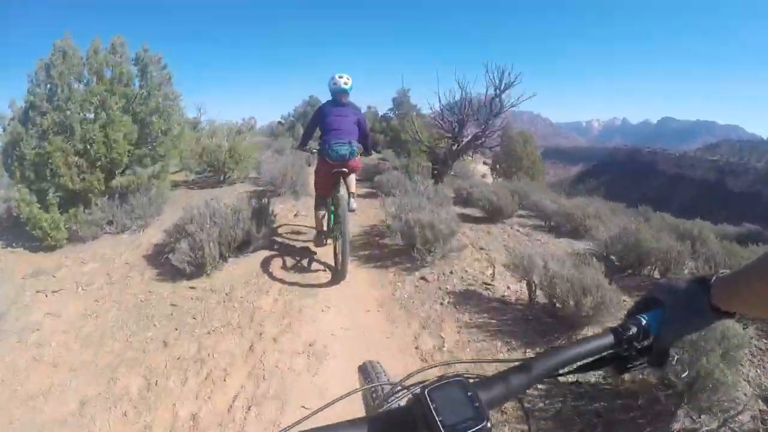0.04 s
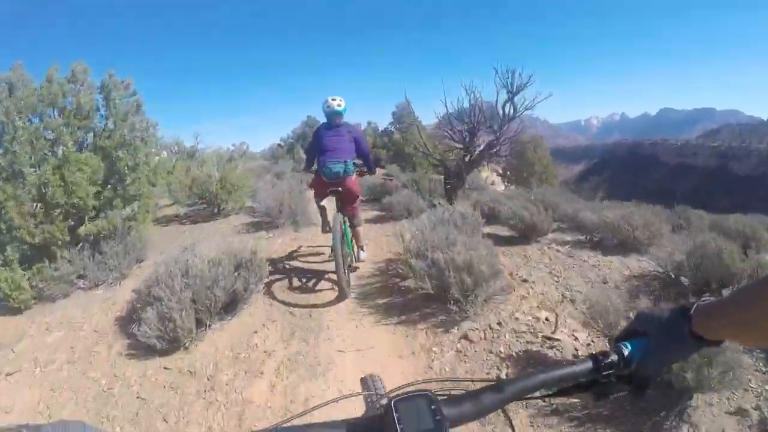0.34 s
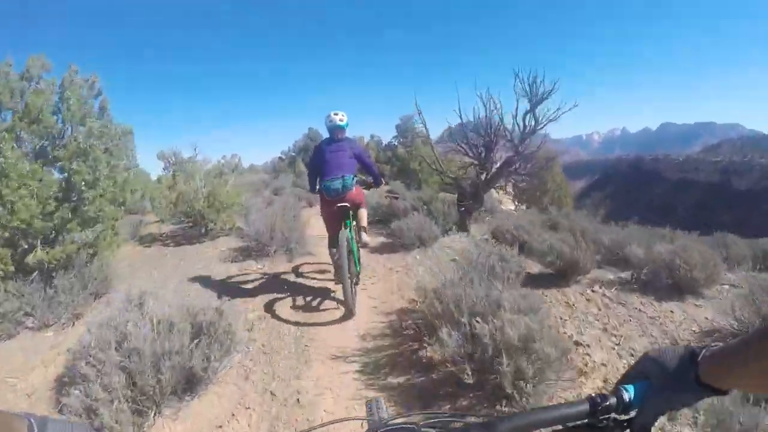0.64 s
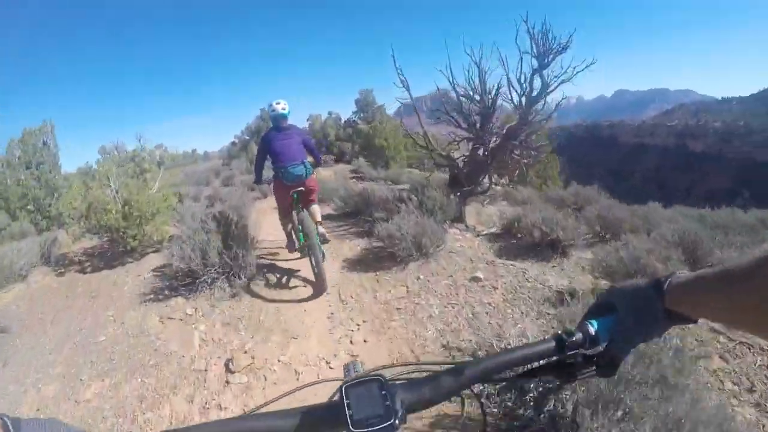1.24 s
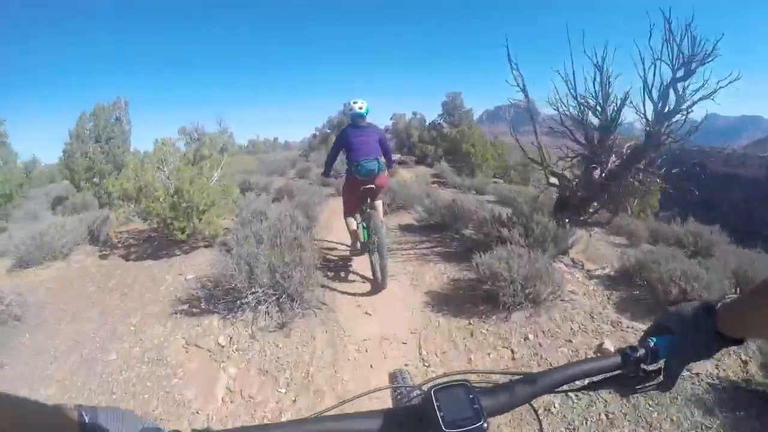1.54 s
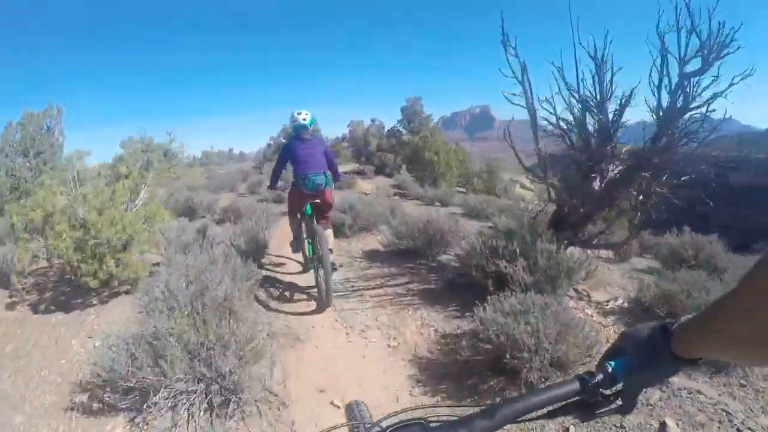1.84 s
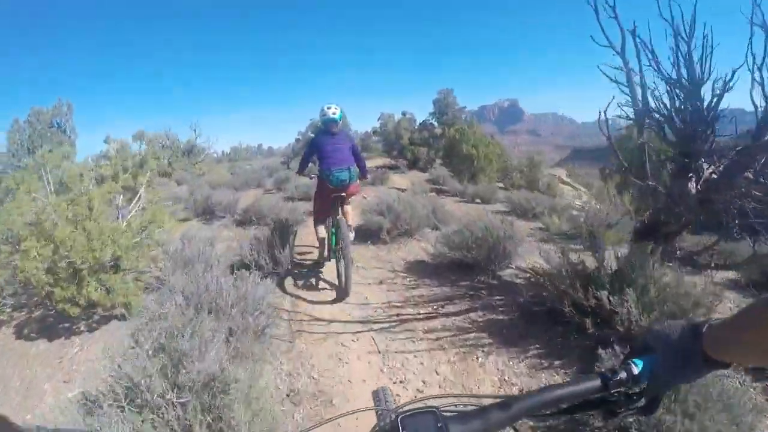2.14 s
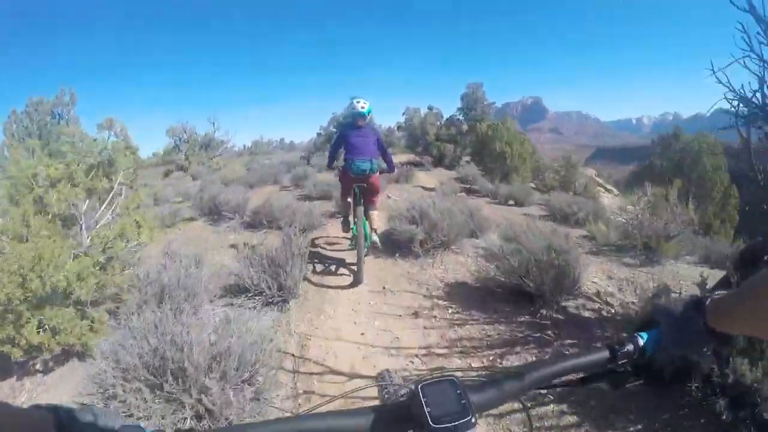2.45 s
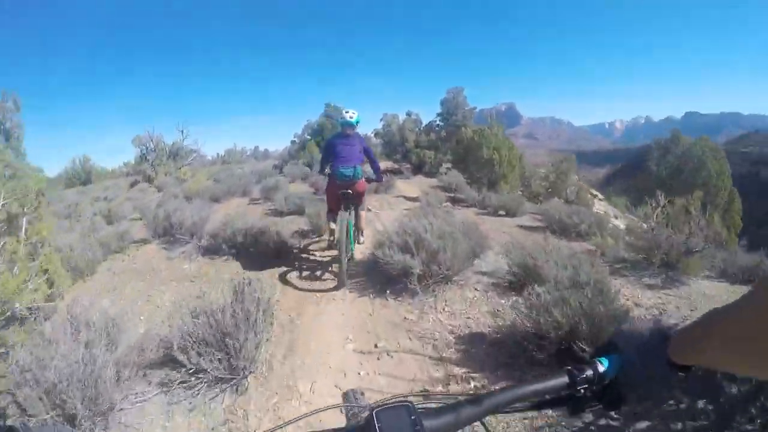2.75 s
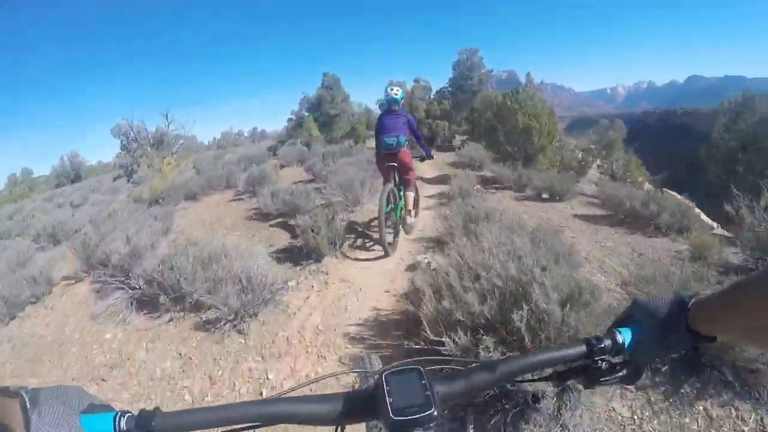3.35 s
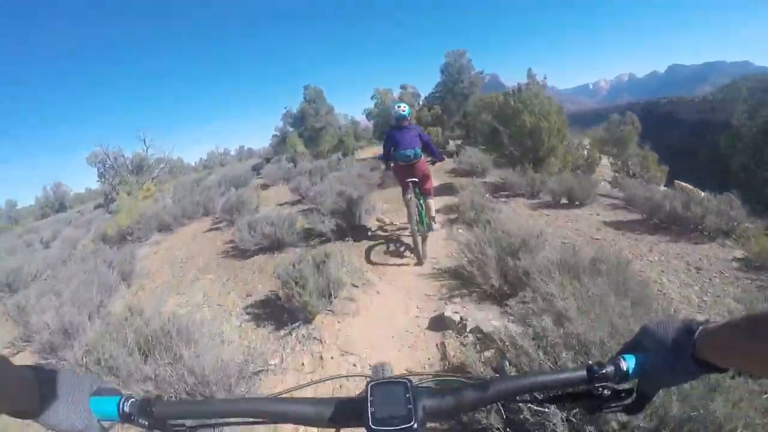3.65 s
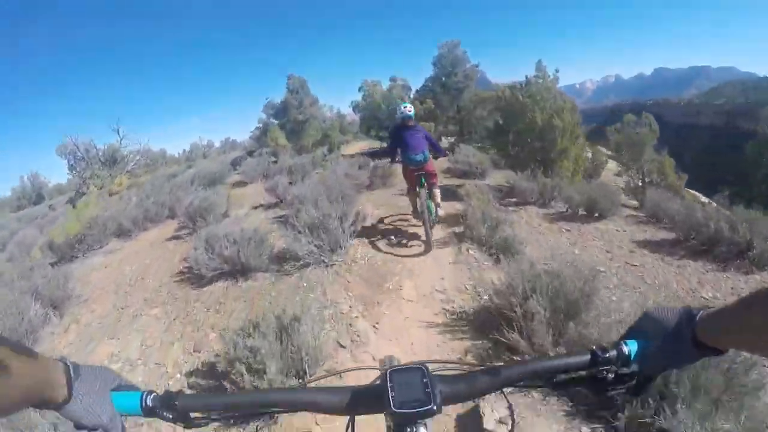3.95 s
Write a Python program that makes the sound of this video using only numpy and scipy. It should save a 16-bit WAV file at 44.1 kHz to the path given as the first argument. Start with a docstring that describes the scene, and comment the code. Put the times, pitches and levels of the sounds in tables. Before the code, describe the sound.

A mountain bike rolls over dirt, with wind buffeting the microphone and gear shifter clicks.

```python
"""A mountain bike rolls along a dry dirt trail, heard from a camera on the rider's chest.
From the start, wind buffets the microphone and the tyres roar and crunch. Soon the chain rattles and
pebbles scrape. At about 1 s the gear shifter clicks in and out and the chain whirs up; both happen
again near 2.8 s. After 3 s the freehub (the rear wheel's ratchet) ticks louder as the bike coasts,
and near 3.7 s a loose stone clacks under a wheel."""
import sys
import numpy as np
from scipy import signal
from scipy.fft import rfft, irfft
from scipy.io import wavfile
from scipy.ndimage import uniform_filter1d

SR = 44100
rng = np.random.default_rng(int(sys.argv[2]) if len(sys.argv) > 2 else 0)


def transcribe(signal):
    """Save signal, clipped to [-1, 1], as a 16-bit WAV file at the path in sys.argv[1]."""
    frames = np.atleast_2d(signal).T
    limited = np.clip(frames, -1, 1)
    pcm = np.round(limited * 32767).astype(np.int16)
    wavfile.write(sys.argv[1], SR, pcm)


N = 176400  # 4 seconds
TIME = np.arange(N) / SR


def gain(db):
    """Turn decibels into a multiplier."""
    return 10 ** (np.asarray(db) / 20)

def unit(x):
    """Scale to an average strength (rms) of 1."""
    return x / np.sqrt(np.mean(x ** 2))

def curve(table, column=1):
    """Join one column of a table with straight lines over time."""
    rows = np.array(table)
    return np.interp(TIME, rows[:, 0], rows[:, column])

def colour(x, tone):
    """Shape a sound's lows and highs with (frequency [Hz], level [dB]) points."""
    hz, db = np.array(tone).T
    log_hz = np.log(np.maximum(np.arange(N // 2 + 1) * SR / N, 1))
    outside = np.maximum(np.log(hz[0]) - log_hz, 0) + np.maximum(log_hz - np.log(hz[-1]), 0)
    shape_db = np.interp(log_hz, np.log(hz), db) - 20 * outside
    return unit(irfft(rfft(x) * gain(shape_db), N))

def noise(tone):
    """Noise with the given tone."""
    return colour(rng.standard_normal(N), tone)

def wander(per_s):
    """A value that glides randomly up and down."""
    step = int(SR / per_s)
    stairs = np.repeat(rng.standard_normal(N // step + 1), step)
    return unit(uniform_filter1d(stairs, step)[:N])

def grains(per_s, spread_db):
    """Tiny random hits, a few much stronger than the rest."""
    size = gain(spread_db * np.minimum(rng.exponential(size=N), 4))
    return (rng.random(N) < per_s / SR) * size * rng.choice([-1, 1], N)

def fade(start, decay_s, rise_s):
    """A level that rises quickly, then falls to about a third every decay_s."""
    age = np.maximum(TIME - start, 0)
    fall = np.minimum(np.maximum(age - rise_s, 0) / decay_s, 50)
    return np.minimum(age / rise_s, 1) * np.exp(-fall)

def swell(middle, width):
    """A smooth, bell-shaped rise and fall."""
    return np.exp(-.5 * np.minimum(((TIME - middle) / width) ** 2, 100))

def ring(start, notes, rise_s):
    """A struck object's notes, a little different at each hit; each drops 60 dB in its ring time."""
    age = np.arange(SR // 8) / SR
    wave = 0
    for hz, ring_s, db in notes:
        cycles = hz * (1 + .01 * rng.standard_normal()) * age + rng.random()
        wave += gain(db - 60 * age / ring_s) * np.sin(2 * np.pi * cycles)
    wave *= np.minimum(age / rise_s, 1)
    return np.concatenate([np.zeros(int(start * SR)), wave, np.zeros(N)])[:N]

def resonate(x, hz, sharpness):
    """Bring out one pitch by filtering twice."""
    peak = signal.iirpeak(hz, sharpness, fs=SR)
    return unit(signal.lfilter(*peak, signal.lfilter(*peak, x)))

def noise_band(hz, width_hz):
    """A narrow band of noise that follows a pitch curve."""
    lowpass = signal.butter(2, width_hz / 2, fs=SR, output="sos")
    slow = signal.sosfilt(lowpass, rng.standard_normal((2, N)))
    phase = 2 * np.pi * np.cumsum(hz) / SR
    return unit(slow[0] * np.cos(phase) + slow[1] * np.sin(phase))

def turbulence(tone, smooth_s=.045):
    """Swirling air: noise with its slow swells evened out."""
    air = noise(tone)
    power = np.abs(signal.hilbert(air)) ** 2 / 2
    return air / np.sqrt(uniform_filter1d(power, int(smooth_s * SR)))


# How hard the wind blows (time [s], level [dB])
WIND_LEVELS = [(0.0, -23.5), (0.26, -24.5), (0.33, -15), (0.39, -20.5), (0.52, -12), (0.6, -26), (0.7, -21),
               (0.76, -27.5), (0.87, -32.5), (0.9, -16), (1.05, -24), (1.08, -19.5), (1.13, -20),
               (1.19, -15), (1.24, -21), (1.34, -9.5), (1.38, -30.5), (1.49, -23), (1.54, -28), (1.59, -15),
               (1.68, -11), (1.76, -21), (1.82, -16), (1.88, -30), (2.03, -14), (2.06, -25), (2.12, -16),
               (2.38, -26.5), (2.53, -23), (2.57, -28), (2.73, -22), (2.76, -34.5), (2.91, -38.5),
               (2.95, -27), (2.99, -43), (3.06, -28), (3.11, -14.5), (3.16, -27.5), (3.37, -29),
               (3.45, -15.5), (3.7, -25), (3.76, -15.5), (3.85, -23), (3.89, -10), (3.97, -10.5),
               (4.0, -39)]
# The wind's deep tone (frequency [Hz], level [dB])
WIND_TONE = [(10, -11), (20, -4.5), (32, 4), (55, -4), (80, -8), (120, -17.5), (200, -31), (400, -51.5),
             (900, -79)]

def wind_rumble():
    """Air rushing over the microphone rumbles as the flow rises and falls."""
    return turbulence(WIND_TONE) * gain(curve(WIND_LEVELS) + .5)


# How loudly the tyres roll (time [s], roar level [dB], grit level [dB])
ROLL_LEVELS = [(0.0, -49, -53.5), (0.47, -52.5, -54), (1.08, -50, -53.5), (1.37, -49, -49.5),
               (1.53, -52, -53), (1.74, -49.5, -55), (1.97, -51, -55.5), (2.22, -47.5, -53.5),
               (2.29, -48.5, -51), (2.71, -49, -53.5), (3.1, -46.5, -54), (3.46, -48.5, -51.5),
               (3.77, -47.5, -53.5), (3.88, -48.5, -49.5), (4.0, -45, -46)]
# Tones of the tread's roar and of the grit (frequency [Hz], level [dB])
ROAR_TONE = [(150, 5.5), (300, 2), (500, 2), (640, -2), (800, 1), (1000, -5), (1500, -11.5), (1800, -11),
             (2400, -22), (5000, -33)]
GRIT_TONE = [(1200, 13), (2300, 2), (3000, 1), (4000, 3), (4900, -4), (5800, -3), (7200, -7.5),
             (9000, -13.5), (11500, -11.5), (13000, -18), (15000, -11.5)]
# A hollow hum near 1400 Hz that swells and fades as the bike rolls (time [s], level [dB])
HUM_LEVELS = [(0, -59), (.14, -51), (.26, -44), (.37, -63), (.47, -51.5), (.68, -51.5), (.85, -64),
              (1.4, -54.5), (2.11, -70), (2.23, -38.5), (2.34, -55.5), (2.44, -51), (2.7, -62), (3.02, -48),
              (3.3, -63), (4, -50.5)]
# Pitch of that hum (time [s], pitch [Hz])
HUM_PITCH = [(0, 1390), (2.22, 1340), (2.45, 1520), (3.3, 1400)]

def rolling(flicker_db=1.3):
    """The tyres roar on packed dirt and crush sand of many pitches; a hollow hum comes and goes."""
    roar = noise(ROAR_TONE) * gain(curve(ROLL_LEVELS) + 3.5 + flicker_db * wander(24.95))
    hum = noise_band(curve(HUM_PITCH), width_hz=380) * gain(curve(HUM_LEVELS))
    hiss = noise(GRIT_TONE)
    sand = 0
    for hz in np.geomspace(2000, 14000, 16) * (1 + .03 * rng.standard_normal(16)):
        sand += np.sqrt(hz) * resonate(grains(per_s=150, spread_db=3.5), hz, sharpness=7)
    grit = hiss + gain(-3.5) * colour(sand, GRIT_TONE)
    grit_db = curve(ROLL_LEVELS, column=2) - .5 + flicker_db * wander(16)
    return roar + hum + grit * gain(grit_db)


# Chain rattles, plus a short dull knock on the wind thump at 0.7 s
# (time [s], decay [s], level [dB], low ring relative to that level [dB])
RATTLES_AND_KNOCK = [(0.091, 0.0023, -56, 21.5), (.700, 0.0037, -66.5, 32.5), (0.8656, 0.0027, -31.5, -26),
                     (0.9, 0.028, -56, 9), (1.236, 0.0084, -49, 3), (1.355, 0.0041, -48, -19),
                     (1.496, 0.0088, -42.5, -28), (1.703, 0.01, -47.5, 13), (1.828, 0.0083, -55, 15),
                     (1.901, 0.0059, -61.5, 23), (1.951, 0.0075, -49, 3), (2.146, 0.0047, -56.5, 24),
                     (2.216, 0.014, -45.5, 10), (3.418, 0.0055, -62.5, 22), (3.488, 0.013, -38, 7),
                     (3.497, 0.0054, -42.5, 11), (3.713, 0.0044, -51, 20)]
# Tones of the chain, the bike frame and the gear wheels (frequency [Hz], level [dB])
CHAIN_TONE = [(1000, -55), (2500, -2.5), (3900, 6), (5000, 4.5), (8000, -5), (11500, -3.5), (15000, -7)]
FRAME_TONE = [(300, -23), (800, 8), (1500, 1.5), (2500, -5.5), (5000, -20.5)]
GEAR_TONE = [(1500, -5), (2200, -12.5), (2550, 4), (2750, 3.5), (3000, 4), (3300, -2), (3900, -2),
             (4600, -6.5), (5200, -17), (12000, -24)]
# The whir of the pulled chain on the gear wheels (time [s], level [dB])
GEAR_LEVELS = [(1.15, -69), (1.24, -55.5), (1.5, -57.5), (1.6, -67), (2.92, -64), (3.0, -48.5), (3.2, -54),
               (3.45, -58), (3.85, -51), (4, -57)]

def chain_and_knock():
    """Links clatter, shake the frame and whir over the gear wheels; one dull knock sounds at 0.7 s."""
    links = unit(grains(per_s=1400, spread_db=2.5)) + rng.standard_normal(N)
    bright, low = colour(links, CHAIN_TONE), colour(links, FRAME_TONE)
    bursts = sum(gain(db) * fade(start, decay_s, rise_s=.0016) * (bright + gain(low_db) * low)
                 for start, decay_s, db, low_db in RATTLES_AND_KNOCK)
    return bursts + colour(links, GEAR_TONE) * gain(curve(GEAR_LEVELS))


# Pebbles under the tyres (time [s], pitch [Hz], level [dB])
PEBBLE_SCRAPES = [(0.2256, 3850, -46), (.390, 6800, -50), (1.967, 9700, -52.5), (3.547, 4500, -46)]

def pebbles():
    """Each pebble scrapes briefly at its own pitch."""
    out = 0
    for start, hz, db in PEBBLE_SCRAPES:
        scratch = resonate(rng.standard_normal(N), hz, sharpness=5)
        out += gain(db) * fade(start, decay_s=.009, rise_s=.002) * scratch
    return out


# Small swirls of air hitting the microphone (time [s], width [s], level [dB])
AIR_SWIRLS = [(0.326, 0.0018, -9), (0.7013, 0.0014, 1), (.913, 0.0019, -12.5), (1.063, 0.0014, -9),
              (1.081, 0.0027, -7), (1.296, 0.0043, -5), (1.424, 0.0077, -7.5), (1.994, 0.0012, -4),
              (2.01, 0.0013, -11), (2.023, 0.00079, -8.5), (2.11, 0.0015, -5.5), (2.134, 0.0015, -2.5),
              (2.513, 0.0019, -6), (3.124, 0.0054, -8), (3.7518, 0.0019, 1.5), (3.918, 0.0012, -6),
              (3.977, 0.0012, -3.5)]

def wind_thumps(rebound_delay_s=.0088, rebound_width_s=.00344):
    """Each swirl pushes on the microphone's opening, then the pressure swings back."""
    out = 0
    for middle, width, db in AIR_SWIRLS:
        push = (1 + ((TIME - middle) / width) ** 2) ** -1.5
        rebound = .46 * swell(middle + rebound_delay_s, rebound_width_s)
        out += gain(db) * (push - rebound)
    return out


# Stronger gusts (middle time [s], half length [s], level [dB])
GUST_SWELLS = [(0.356, 0.019, -31.5), (0.907, 0.019, -35), (1.064, 0.037, -29.5), (1.28, 0.032, -39.5),
               (1.58, 0.056, -33), (2.008, 0.019, -19.5), (2.127, 0.018, -15.5), (2.204, 0.09, -29.5),
               (3.51, 0.019, -22.5), (3.758, 0.098, -31), (3.933, 0.027, -31), (3.969, 0.012, -15)]
# Their fluttering tone (frequency [Hz], level [dB])
GUST_TONE = [(40, -56), (110, 6.5), (160, 1), (250, -5), (360, -12), (700, -33.5), (1500, -55)]

def wind_gusts():
    """Short gusts flutter on the microphone, higher in pitch than the rumble."""
    strength = sum(gain(db) * swell(middle, half) for middle, half, db in GUST_SWELLS)
    return turbulence(GUST_TONE) * strength


# The lever is pressed, then springs back
# (time [s], level [dB], lever pitch [Hz], lever ring time [s], lever note level [dB])
LEVER_PRESSES = [(1.0438, -11.5, 3605, 0.0094, -1), (2.7871, -13.5, 4100, 0.015, -13)]
LEVER_RELEASES = [(1.1890, -15.5, 4170, .009, 8), (2.9052, -16.5, 3480, 0.0051, 15.8)]
# Notes of the shifter's case (pitch [Hz], ring time [s], press level [dB], release level [dB])
CASE_NOTES = [(1360, 0.018, -7, -40), (2225, 0.019, -10, -11), (5560, 0.0099, -22, 1.5),
              (6490, 0.012, 2, 4), (8230, 0.0089, 5, -11), (8740, 0.0071, -5, 4), (10270, .0051, 3, -18),
              (14400, 0.0056, 2, 11)]
# Tone of the handlebar's ringing (frequency [Hz], level [dB])
HANDLEBAR_TONE = [(300, -41), (700, 7), (1500, 13.5), (3500, 5), (7000, 3), (15000, -5)]

def shifter(rise_s=.0015, bar_ring_s=.06, echo_s=.0061):
    """A ratchet slips over a tooth, rings the lever and case, and dies away in the handlebar."""
    snap = gain(-2) * noise([(1000, -45), (3000, 17), (15000, 13)])
    handlebar = gain(-16.5) * noise(HANDLEBAR_TONE)
    hz, ring_s, press_db, release_db = np.array(CASE_NOTES).T
    out = 0
    for moves, note_db in ((LEVER_PRESSES, press_db), (LEVER_RELEASES, release_db)):
        for start, db, *lever_note in moves:
            notes = [*zip(hz, ring_s, note_db), lever_note]
            click = ring(start, notes, rise_s) + snap * fade(start, .0009, rise_s)
            tail = handlebar * fade(start, bar_ring_s / np.log(1000), rise_s)
            slip = np.clip((TIME - start) / rise_s, 0, 1)  # the slip speeds up
            out += gain(db) * slip * (click + tail)
    echo = gain(-26.5) * np.roll(out, int(echo_s * SR))  # off the rider's body
    return out + echo


# Freehub ticking, very faint before the first row (time [s], tick rate [1/s], level [dB])
HUB_TICKS = [(3.05, 64, -74), (3.2, 46, -66.5), (3.45, 45, -61.5), (3.56, 57, -61), (3.8, 52, -64),
             (3.95, 50, -66)]

def freehub(decay_s=.003, jitter=.08, spread_db=2.5):
    """Small catches drop over the ratchet teeth in a thin purr, no two ticks alike."""
    rate = curve(HUB_TICKS) * (1 + jitter * wander(40))
    since_tick = np.cumsum(rate / SR) % 1 / rate
    ticks = unit(np.exp(-since_tick / decay_s))
    steel = noise_band(hz=np.full(N, 11700), width_hz=2300)
    return steel * ticks * gain(curve(HUB_TICKS, column=2) + spread_db * wander(40))


# Knocks of the stone (time [s], level [dB], pitch multiplier [ratio])
STONE_KNOCKS = [(3.6589, -19.5, 1.02), (3.6617, -10.5, 0.981), (3.6688, -26.5, 0.71), (3.6781, -16, .96),
                (3.7272, -22, 0.62), (3.738, -31.5, 1)]
# Notes of the stone and wheel rim (base pitch [Hz], ring time [s], level [dB])
STONE_NOTES = [(503, 0.13, -13.5), (676, 0.023, -12), (880, 0.015, 0.5), (1220, 0.025, 1),
               (1530, 0.02, -1.5), (2000, 0.021, -2.5), (3430, 0.019, -11)]
# Tone of the crack in each knock (frequency [Hz], level [dB])
CRACK_TONE = [(300, 5), (600, 9), (1700, 2.5), (2500, -12.5), (4000, -11.5), (7000, -23), (15000, -28)]

def stone():
    """A loose stone tips under the tyre and knocks several times, each edge at its own pitch."""
    crack = gain(-7) * noise(CRACK_TONE)
    out = 0
    for start, db, pitch in STONE_KNOCKS:
        notes = [(hz * pitch, ring_s, note_db) for hz, ring_s, note_db in STONE_NOTES]
        burst = crack * fade(start, decay_s=.0085, rise_s=.00034)
        out += gain(db) * (ring(start, notes, rise_s=.00056) + burst)
    return out


def scene():
    """Bike and wind reach one microphone in the open air."""
    ride = shifter() + chain_and_knock() + stone() + pebbles() + rolling() + freehub()
    wind = wind_rumble() + wind_thumps() + wind_gusts()
    return (ride + wind)[None]

def record(dry, low_hz=12, top_hz=15300):
    """The camera blocks the deepest rumble, rounds off the loudest peaks and cuts the highest treble."""
    low_cut = signal.butter(1, low_hz, "high", fs=SR, output="sos")
    high_cut = signal.ellip(10, .2, 80, top_hz, fs=SR, output="sos")
    x = signal.sosfilt(low_cut, dry)
    rounded = x / (1 + x ** 8) ** (1 / 8)
    return signal.sosfilt(high_cut, rounded)


dry = scene()
out = record(dry)
transcribe(out)
```